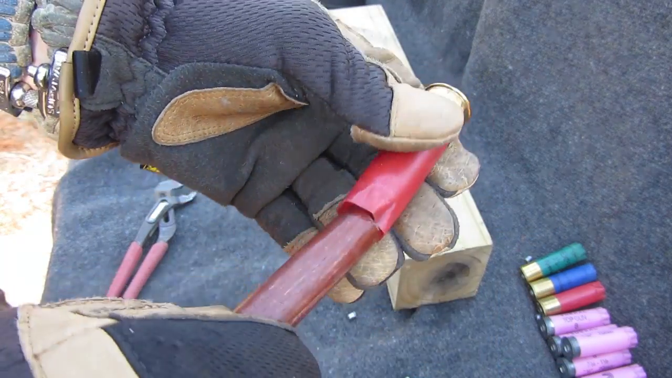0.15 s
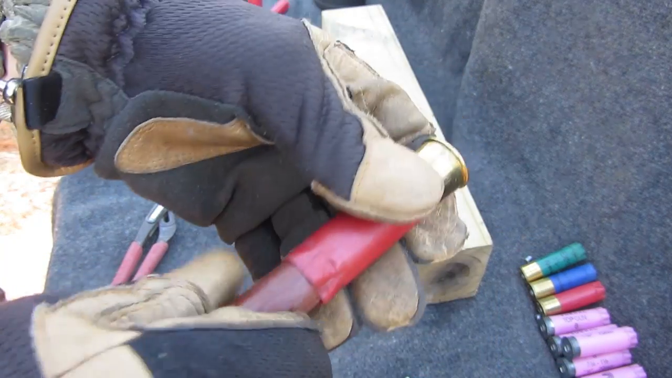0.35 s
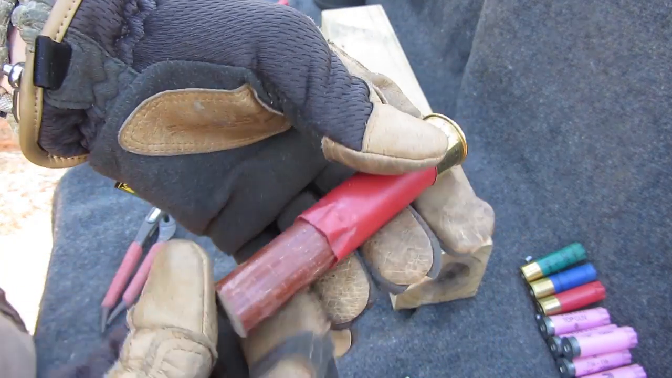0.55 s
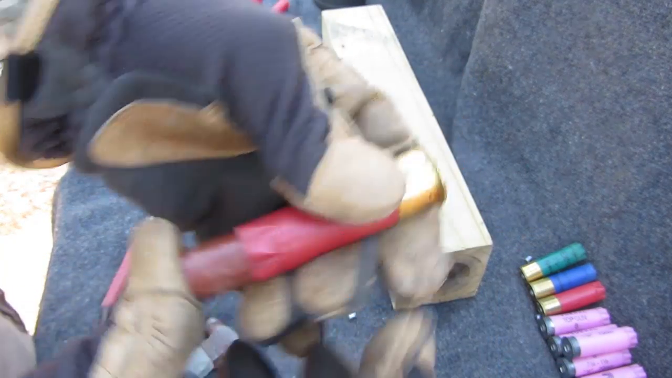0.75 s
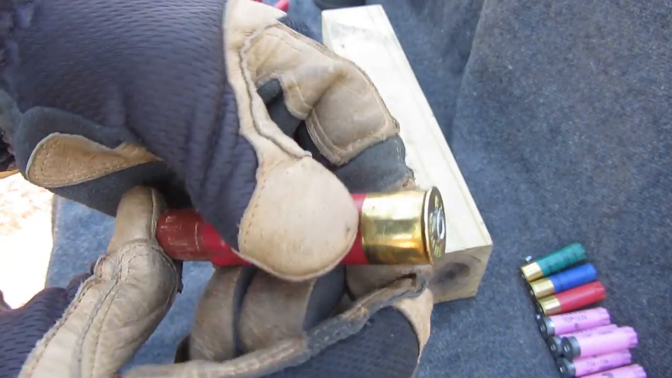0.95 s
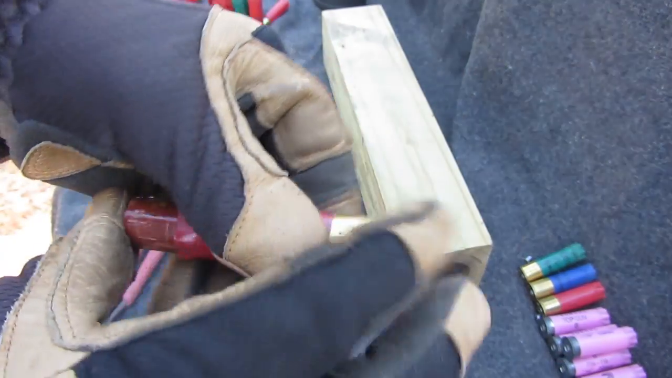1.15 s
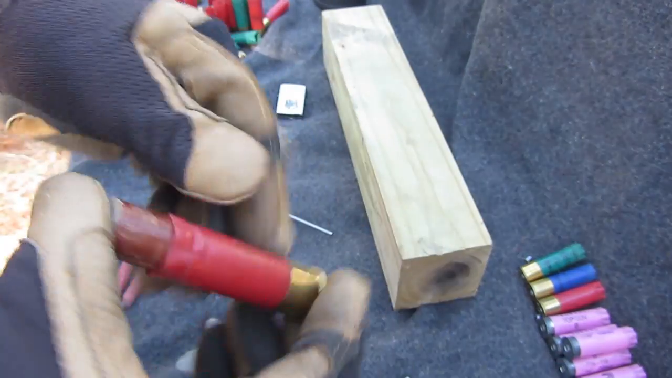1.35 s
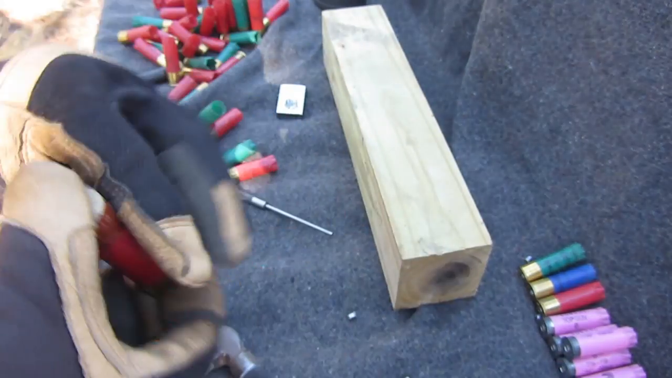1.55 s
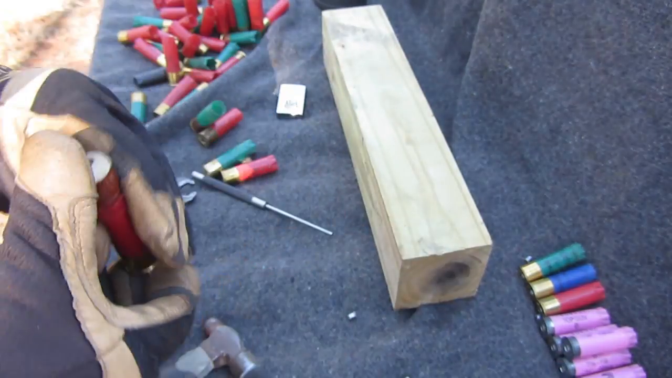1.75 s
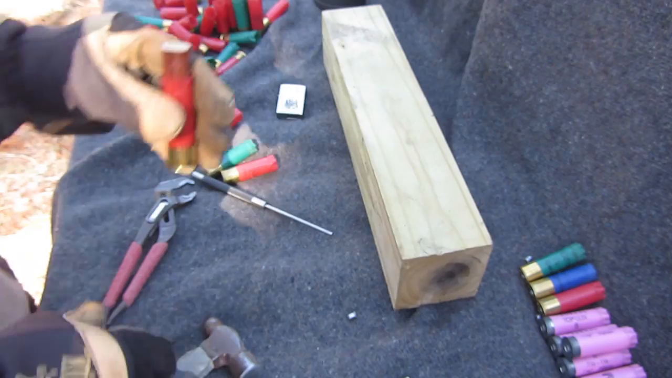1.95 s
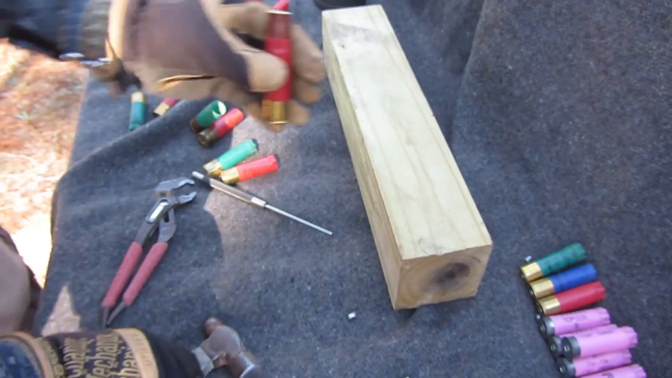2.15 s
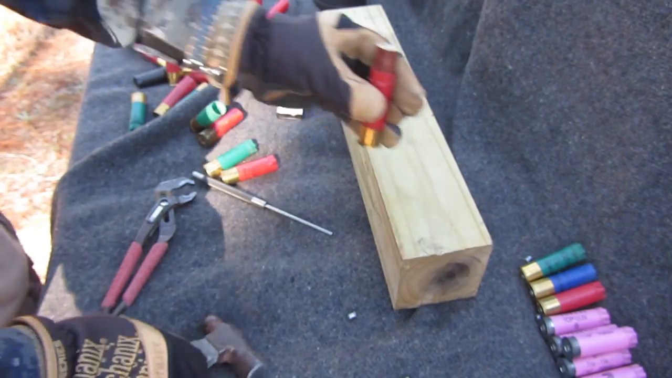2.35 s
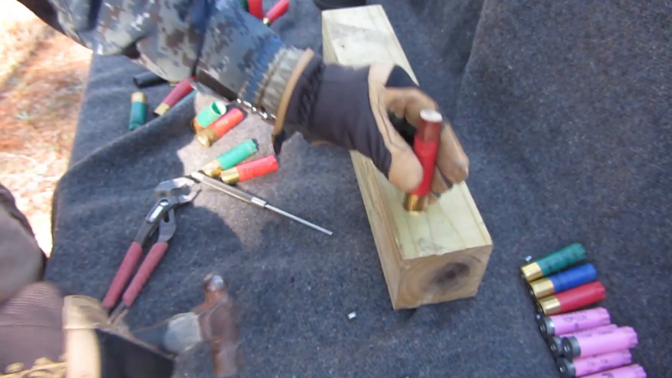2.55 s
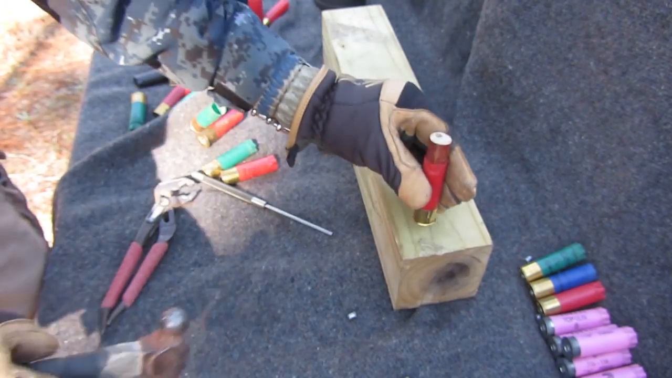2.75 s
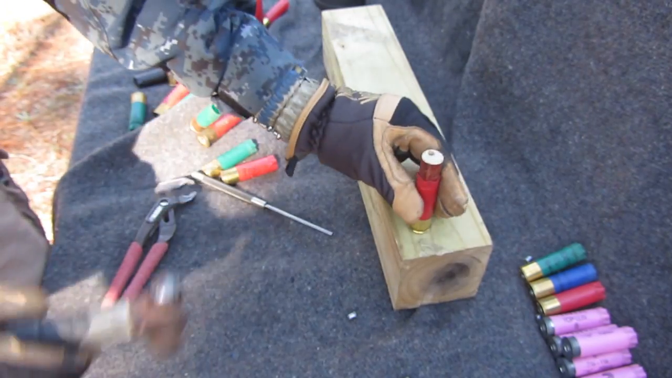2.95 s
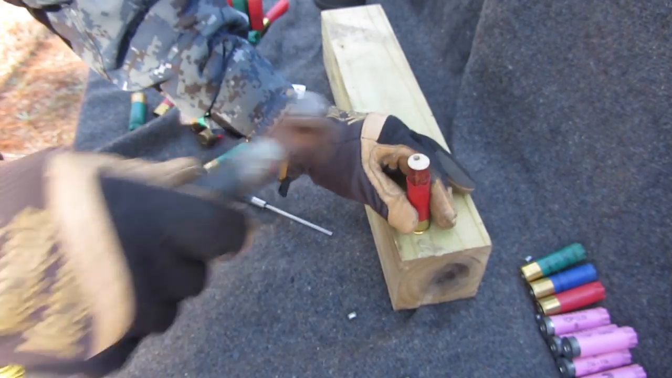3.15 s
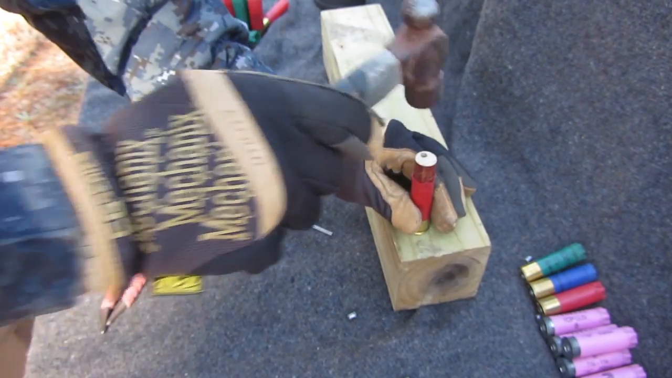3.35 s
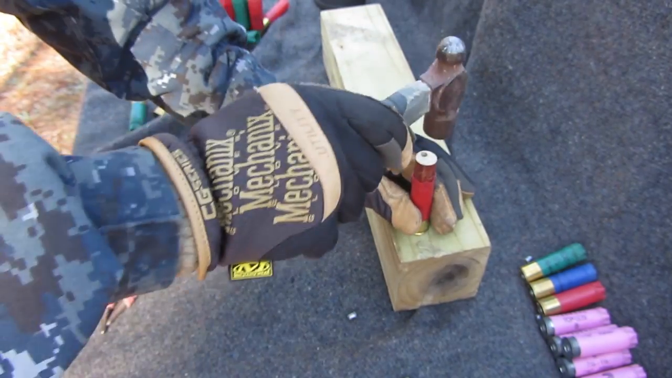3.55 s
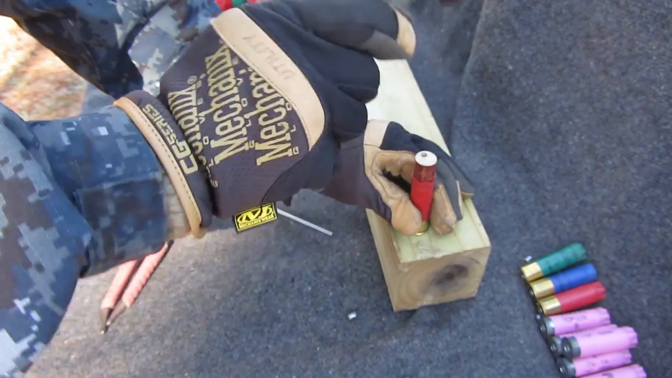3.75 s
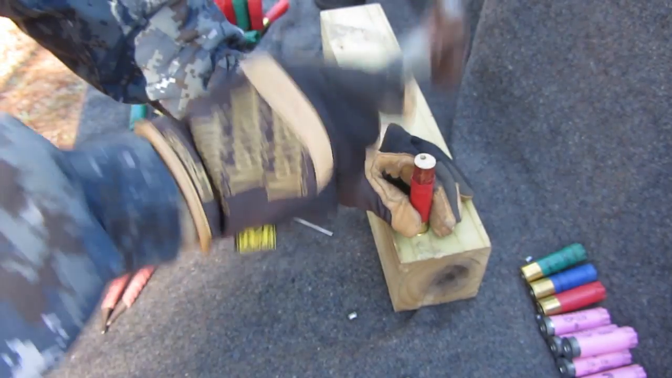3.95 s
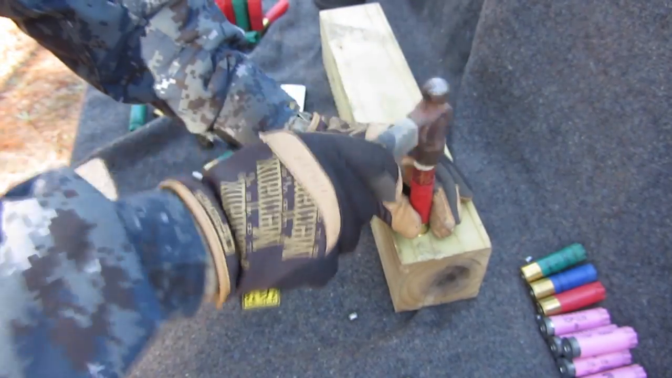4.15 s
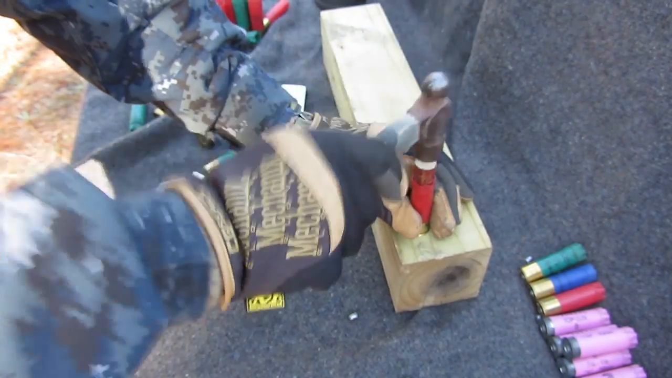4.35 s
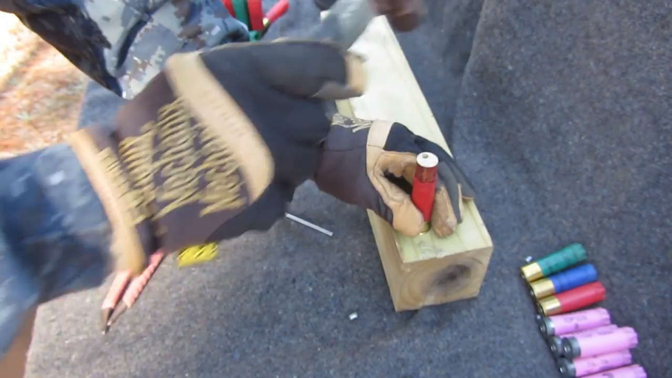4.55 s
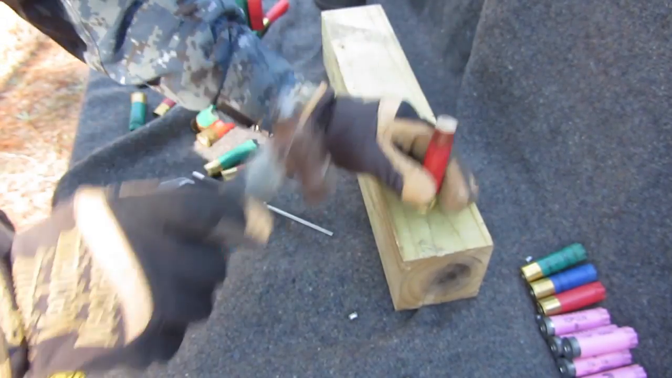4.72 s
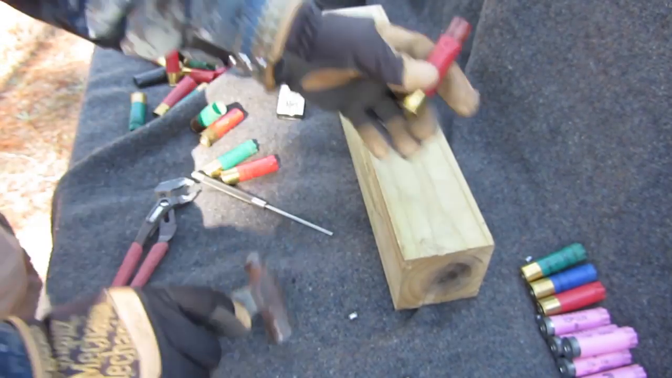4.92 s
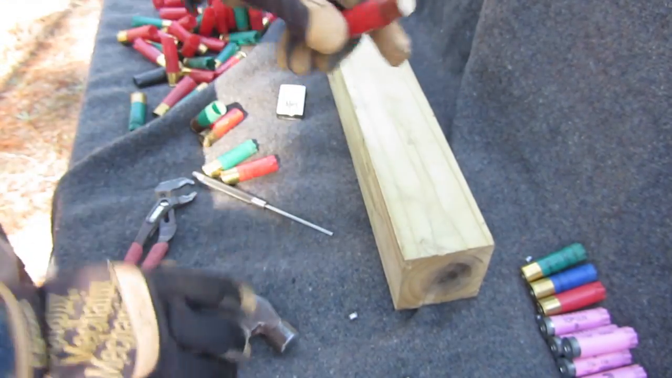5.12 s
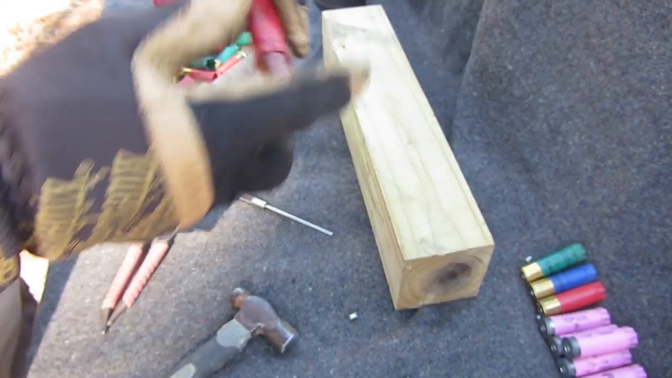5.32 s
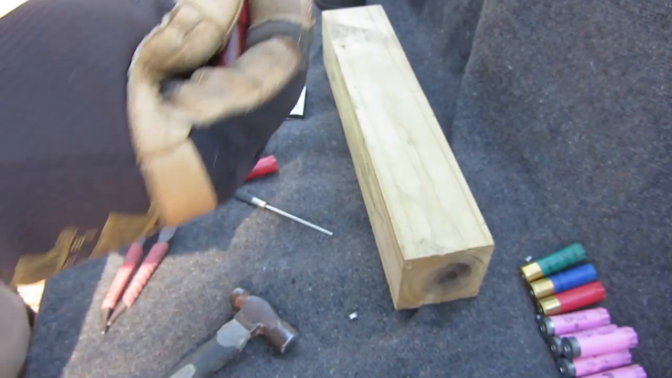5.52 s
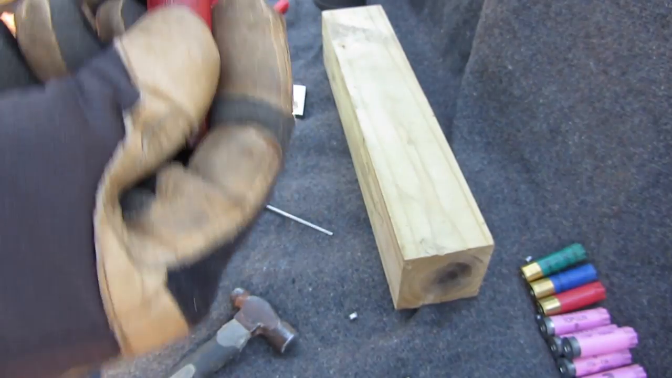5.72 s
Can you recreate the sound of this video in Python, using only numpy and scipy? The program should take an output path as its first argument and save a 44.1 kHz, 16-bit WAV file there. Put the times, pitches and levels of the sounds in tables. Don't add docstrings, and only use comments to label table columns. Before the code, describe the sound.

At arm's length from a small microphone outdoors, plastic clicks and a muffled pop come first, followed by fabric rustle, small ticks and light wind bumps. A small woody knock precedes three hard, steel-bright hammer strikes with deep wooden boom and short rattling tails. Two duller thumps follow, then near quiet with faint rustling over low rumble.

```python
import sys
import numpy as np
from scipy import signal
from scipy.fft import rfft, irfft, next_fast_len
from scipy.io import wavfile
from scipy.ndimage import uniform_filter1d

SR = 44100
rng = np.random.default_rng(int(sys.argv[2]) if len(sys.argv) > 2 else 0)


def natural_amplitude(level_db):
    exponent = np.asarray(level_db, float) / 20
    return 10 ** exponent


def waveform_to_disk(signal):
    frames = np.transpose(np.atleast_2d(signal))
    scaled = np.clip(frames, -1, 1) * 32767
    samples = np.round(scaled).astype(np.int16)
    wavfile.write(sys.argv[1], SR, samples)


N = 254898


def lowpass(x, order, hz):
    return signal.sosfilt(signal.butter(order, hz, fs=SR, output="sos"), x)


def band(x, hz, octaves):
    edges = [hz * 2 ** (-octaves / 2), min(hz * 2 ** (octaves / 2), .45 * SR)]
    return signal.sosfilt(signal.butter(2, edges, "bandpass", fs=SR, output="sos"), x)


def unit(x):
    return x / np.abs(x).max()


def ring(modes, length_s):
    t = np.arange(int(length_s * SR)) / SR
    hz, db, t60 = np.transpose(modes)[:, :, None]
    sound = np.sum(natural_amplitude(db - 60 * t / t60) * np.sin(2 * np.pi * hz * t), axis=0)
    return signal.sosfilt(signal.butter(5, 0.81 * hz.min(), "highpass", fs=SR, output="sos"), sound)


def puff(hz, octaves, t60):
    t = np.arange(int(2 * t60 * SR)) / SR
    return unit(band(rng.standard_normal(len(t)) * natural_amplitude(-60 * t / t60), hz, octaves))


def push(x, contact_s):
    return np.convolve(x, np.hanning(int(contact_s * SR) + 3))[:len(x)]


def bend(x, lag_s):
    size = next_fast_len(2 * len(x))
    khz = np.arange(size // 2 + 1) * SR / size / 1000
    turn = np.exp(-4j * np.pi * 1000 * lag_s * np.sqrt(khz))
    return irfft(rfft(x, size) * turn, size)[:len(x)]


def add(out, s, sound, db, pan_db, lag=0):
    sound = np.atleast_2d(sound) * natural_amplitude(db + np.array([[pan_db], [-pan_db]]) / 2)
    for channel, start in enumerate([int(s * SR) + lag, int(s * SR)]):
        piece = out[channel, start:start + sound.shape[1]]
        piece += sound[channel, :len(piece)]


def walk(rate):
    k = int(SR / rate)
    steps = np.repeat(rng.standard_normal(N // k + 1), k)
    return 1.2 * uniform_filter1d(uniform_filter1d(steps, k), k)[:N]


def gestures(t, rows, db):
    fade_db = 8.5
    s, half_s = np.array(rows)[:, :2, None].transpose(1, 0, 2)
    return np.sum(natural_amplitude(2 * (db[:, None] - fade_db * np.abs(t - s) / half_s)), axis=0)


# t/s, level/dB
GAIN = [
    (0, -55.5),
    (.4, -65),
    (1.9, -57),
    (3.9, -51.5),
    (3.93, -67),
    (4.25, -66.5),
    (5.78, -69),
]
OUTDOORS = [-6, -0.5, -10, -13.5]
# t/s, level over the gain/dB
STIR = [
    (0, -2.5),
    (.7, -3.5),
    (1.3, -3.5),
    (1.85, -2.5),
    (2.3, 0),
    (2.85, -3),
    (3.9, -7),
    (3.95, -16),
    (4.6, -12.5),
    (5.78, -5),
]
# peak t/s, half-length/s, level/dB, brightness/dB
RUSTLES = [(0, 0.039, -62, 1), (.36, 0.039, -59, 1.5), (.586, 0.027, -55, -4), (.77, 0.052, -53, -2),
           (.88, 0.03, -55.5, 4), (1.06, 0.019, -53.5, -3), (1.15, 0.045, -53.5, -5.5),
           (1.234, 0.031, -58, -5), (1.397, 0.079, -55.5, -2.5), (1.48, 0.02, -50, -8),
           (1.8, 0.015, -62, 0), (1.98, 0.032, -56.5, -6), (2.1, 0.21, -52, -6), (2.3, 0.0067, -48, -10),
           (2.47, 0.066, -51.5, 0), (2.55, 0.034, -62, 7.5), (2.64, 0.076, -61.5, 3.5),
           (2.95, 0.087, -63, -19), (3.044, 0.014, -46, 1), (3.11, 0.052, -50.5, -6),
           (3.242, 0.073, -49, -2.5), (3.36, 0.2, -54.5, 0), (3.5, 0.11, -49, -7.5), (3.73, 0.013, -67, 11),
           (3.885, 0.025, -53, 0.5), (4.18, 0.026, -73, 1.5), (4.728, .015, -76.5, -3),
           (4.862, 0.045, -63.5, -9), (5.24, 0.051, -77, 6.5), (5.548, 0.088, -68.5, -3),
           (5.748, 0.018, -64.5, -6.5)]
# peak t/s, half-length/s, level/dB
GUSTS = [(.06, 0.1, -58.5), (.486, 0.027, -67), (0.573, 0.014, -55), (.9, 0.072, -66), (1.1, 0.18, -65),
         (1.62, 0.031, -58), (2.03, .03, -66), (2.804, .15, -56), (3.122, 0.034, -48), (3.25, 0.048, -49.5),
         (3.4, .1, -55), (3.691, .05, -56), (3.84, .04, -58.5), (4.862, 0.077, -61.5), (5.47, 0.032, -53),
         (5.78, 0.028, -59)]
# peak t/s, half-length/s, level/dB
SHIFTS = [(0, 0.039, -51.5), (0.17, 0.053, -56.5), (0.768, 0.065, -57), (0.972, 0.034, -61),
          (1.48, 0.15, -57), (2.094, 0.2, -53), (2.467, 0.27, -51.5), (3.013, 0.029, -54.5),
          (3.53, 0.32, -50.5), (3.72, 0.031, -51.5), (4.694, .03, -53.5), (4.759, .04, -66)]


def movement():
    t = np.arange(0, N, 44) / SR
    gain_db = np.interp(t, *np.transpose(GAIN))
    stir = natural_amplitude(2 * (gain_db + np.interp(t, *np.transpose(STIR))))
    cloth_db, bright_db = np.transpose(RUSTLES)[2:]
    wind = gestures(t, GUSTS, np.transpose(GUSTS)[2])
    rumble = gestures(t, SHIFTS, np.transpose(SHIFTS)[2])
    body = stir + gestures(t, RUSTLES, cloth_db)
    sheen = stir * natural_amplitude(2 * -8) + gestures(t, RUSTLES, cloth_db + bright_db)
    outdoors = natural_amplitude(2 * (gain_db + np.array(OUTDOORS)[:, None]))
    db = 10 * np.log10(np.array([wind, rumble, body, sheen]) + outdoors)
    return np.array([np.interp(np.arange(N) / SR, t, row) for row in db])


# f/Hz, level per Hz/dB
COLOUR = [(18, -46), (30, -15.5), (86, 0), (540, -4.5), (584, -3.5), (1130, -9), (2170, -7.5), (3670, -15),
          (5740, -13), (7870, -14.5), (14000, -26.5), (16000, -44.5)]
# f/Hz, left-right likeness (-1 to 1)
ALIKE = [(60, -0.39), (130, -0.21), (290, -0.18), (640, 0.066), (1410, 0.36), (3100, 0.25), (6820, 0.14),
         (15000, 0.25)]


def cloth():
    steer = movement()
    fibres = natural_amplitude(np.minimum(1.9 * rng.exponential(size=N), 9) * (rng.random(N) < .05))
    out, shared = 0, walk(30)
    centres = 30 * 2 ** np.arange(0, 9.3, .5)
    colour_hz, colour_db = np.transpose(COLOUR)
    alike_hz, likeness = np.transpose(ALIKE)
    shape_db = np.interp(np.log(centres), np.log(colour_hz), colour_db)
    for hz, db in zip(centres, shape_db):
        place = np.interp(np.log(hz), np.log([70, 300, 1600, 6000]), np.arange(4))
        share = np.maximum(1 - np.abs(place - np.arange(4)), 0)
        alike = np.clip(np.interp(np.log(hz), np.log(alike_hz), likeness), -1, 1)
        mid, side = band(rng.standard_normal((2, N)) * fibres, hz, 0.57)
        pair = np.sqrt(1 + alike) * mid + np.sqrt(1 - alike) * side * np.array([[1], [-1]])
        lift_db = share @ [27.35, 17.9, 14.0, 17.8]
        flicker_db = 1.4 * shared + 0.41 * walk(15)
        out = out + natural_amplitude(db + lift_db + share @ steer + flicker_db) * pair
    return out


# t/s, peak level/dB, f/Hz, t60/s, left minus right/dB
TICKS = [(.0448, -15, 2250, .004, -4.5), (.057, -44, 7500, .004, 0), (0.0732, -46, 9000, .0012, 4),
         (0.1045, -35, 8100, 0.0011, 7), (.247, -46, 1080, .04, -4), (.259, -49, 990, .03, -4),
         (0.281, -42.5, 830, 0.016, -5), (.575, -50, 100, 0.05, -10), (.99, -53.5, 12500, .04, 4),
         (1.15, -50, 2190, .06, -6), (1.495, -42, 1630, 0.0023, 8), (1.653, -48, 1200, 0.0017, 0),
         (2.041, -40, 400, 0.014, 11), (2.298, -47, 12500, 0.0033, 4), (2.3, -47, 2000, .003, 0),
         (2.998, -45, 1950, .009, -6), (3.134, -41, 1200, 0.0061, 0), (3.158, -42, 1000, .006, 0),
         (3.205, -47, 1510, .05, -3), (3.25, -46, 1500, .05, -3), (3.3, -49, 1490, .05, -3),
         (3.593, -40, 240, .03, 5), (3.595, -37, 620, .01, 7), (4.722, -63, 8180, 0.016, -2),
         (4.723, -59.5, 1520, .05, -1), (5.021, -54, 7500, .02, -2.5), (5.749, -55.5, 1200, 0.0068, 3),
         (5.75, -47, 6400, 0.0053, 7)]
# t/s, peak level/dB, f/Hz, t60/s, left minus right/dB
SET_DOWN = [
    (2.904, -37.5, 3700, 0.0026, -5),
    (2.9039, -24.5, 1020, 0.003, -5),
    (2.9045, -35, 640, 0.0053, -10),
    (2.905, -30, 1516, 0.058, -3.5),
]


def ticks():
    out = np.zeros((2, N))
    for s, db, hz, t60, pan_db in TICKS + SET_DOWN:
        grit = 1 + .1 * rng.standard_normal(12)
        rough = np.convolve(ring([(hz, 0, t60)], 1.2 * t60), grit[:int(1 + 4000 / hz)])
        add(out, s, unit(push(rough, 0.18 / hz)), db, pan_db)
    return out


# t/s, level/dB
SCRAPE = [
    [(0.235, -81.5), (0.245, -46), (0.299, -49), (0.359, -43.5), (0.375, -52.5)],
    [(3.022, -60), (3.043, -49), (3.054, -50), (3.066, -65.5)],
    [(3.18, -64.5), (3.22, -53), (3.27, -50), (3.33, -60.5)],
]
# t/s, level/dB
SLIPS = [
    (0.2456, -44),
    (0.3246, -38),
    (0.328, -36.5),
    (0.332, -33),
    (0.336, -32),
    (0.3508, -36),
    (0.3565, -34),
]


def scrape():
    t = np.arange(N) / SR
    db = np.max([np.interp(t, *np.transpose(rows), -120, -120) for rows in SCRAPE], axis=0)
    clicks = (rng.random(N) < 5000 / SR) * rng.standard_normal(N) * natural_amplitude(2.3 * walk(280))
    wall = band(band(clicks, 1900, .6), 1900, 1.0)
    wall = wall + natural_amplitude(-3.0) * band(band(clicks, 3300, 0.46), 3000, 0.83)
    wall = wall + natural_amplitude(-11.5 + 0.38 * (db + 36.5)) * band(clicks, 6000, 1.6)
    out = natural_amplitude(db - 2.5) * wall / wall.std() * natural_amplitude(np.array([[-1.2], [1.2]]))
    for s, slip_db in SLIPS:
        add(out, s, puff(2400, 1.1, .009) + puff(5500, 1.1, .009), slip_db, -1.5)
    return out


# f/Hz, level/dB, t60/s
TUBE = [(1036, -3.5, 0.031), (2000, -9, 0.006), (3570, -1.5, 0.016), (2600, -7, .004), (4550, -9.5, .005),
        (6300, -9, .008), (6750, -10.5, 0.012), (7700, -14.5, 0.0072), (9200, -10, 0.009),
        (10170, -25, 0.0054), (11550, -24, .008), (14140, -30.5, 0.004)]
# t/s, level/dB, air pitch ratio, brightness/dB per octave, left minus right/dB
SNAPS = [
    (0.0439, -14, 1.02, 0, -4.5),
    (0.1778, -38, 1.04, -5.5, -4.5),
    (0.2166, -15.5, 1.03, 2, -4.5),
    (0.244, -41, 1, -3.5, -0.5),
]
# dull level/dB, bright level/dB
LIPS = [
    (-17, -14),
    (-46, -56),
    (-27, -10),
    (-46, -50),
]


def snaps():
    out = np.zeros((2, N))
    for (s, db, ratio, tilt_db, pan_db), (dull_db, bright_db) in zip(SNAPS, LIPS):
        modes = np.array(TUBE)
        modes[:, 1] += tilt_db * np.log2(modes[:, 0] / modes[0, 0])
        modes[0, 0] *= ratio
        add(out, s + 0.00046, ring(modes, 0.08), db, pan_db)
        add(out, s, puff(2500, 1.4, 0.0008), dull_db, pan_db)
        add(out, s, puff(6500, 1.5, 0.006), bright_db, pan_db, lag=1)
    return out


# f/Hz, level/dB, t60/s
SEAT = [(555, -25, 0.01), (1020, -21, 0.0042), (1700, -4, 0.003), (2400, -2, 0.0026), (3200, -2, .003)]
# t/s, level/dB, left minus right/dB
SEATING = (.792, -6.5, -3.5)


def seating():
    out = np.zeros((2, N))
    s, db, pan_db = SEATING
    pop = ring(SEAT[:2], .03) + band(ring(SEAT[2:], .03), 2500, 1.1)
    add(out, s, unit(lowpass(pop, 5, 3800)), db + 3.1, pan_db)
    grow = 882
    hiss = puff(7000, 1.14, 0.059)[grow::-1]
    add(out, s - grow / SR, hiss, db - 27, pan_db)
    return out


# t/s, boom level/dB, clack level/dB, rattle level/dB, bending delay at 1 kHz/s
BLOWS = [
    (3.9096, -7, -8.5, -31, .0011),
    (4.201, -6, -9.5, -25.5, .001),
    (4.422, -7, -8.5, -29, .001),
]


def jolts():
    out = np.zeros((2, N))
    for s, boom_db, *_ in BLOWS:
        add(out, s, puff(55, 1.1, .22), boom_db - 35, -2.5)
    return out


# f/Hz, level/dB, t60/s
RATTLE = [(193, -6.5, 0.88), (340, 3.5, 0.34), (680, -1.5, 0.34), (1290, -2.5, 0.28), (2270, -4, 0.23),
          (3420, -1, 0.099), (5185, -4.5, 0.098), (9000, -25.5, 0.069)]


def rattle(tilt_db, rise_s, wide):
    t = np.arange(int(.7 * SR)) / SR
    mid, side = rng.standard_normal((2, len(t)))
    noise = (mid + wide * side * np.array([[1], [-1]])) * natural_amplitude(1.8 * walk(90)[:len(t)])
    tail = 0
    for k, (hz, db, t60) in enumerate(RATTLE):
        buzz = band(band(noise, hz, 0.78), hz, 1.72) / np.sqrt(hz / SR)
        tail = tail + natural_amplitude(db + tilt_db * k - 60 * t / t60) * buzz
    return tail * (1 - np.exp(-t / rise_s)) ** 2


def deck(table, column, contact_s, lag_s, detune):
    modes = np.array(table)[:, [0, column + 1, -1]]
    modes[:, 0] *= 1 + detune * rng.standard_normal(len(modes))
    boom = ring(modes[3:], 1.2) + ring(modes[:3], 1.2)
    return unit(bend(push(boom, contact_s), lag_s))


# t/s, boom level/dB, rattle level/dB, left minus right/dB
THUDS = [
    (5.016, -14.5, -40.5, -3.5),
    (5.179, -17.5, -44.5, -3),
]
# f/Hz, level under head/dB, level under handle/dB, t60/s
DECK_ASIDE = [(84, -22.5, -24.5, 0.56), (137.6, -22.5, -40.5, 1.1), (165, -27, -32, 1.2),
              (162, -3, -14, 0.39), (199, -1, -7, 0.26), (214, 7.5, 4.5, 0.11), (245, -28, -15, 0.47),
              (277, -17, -9.5, 0.45), (293.3, 5, 3.5, 0.13), (340, -11.5, -16, .3), (372, -13.5, -17, 0.28),
              (490, -10, -13, 0.21), (564, -31, -27, 0.4), (596, -19, -32, 0.36), (673, -12.5, -23.5, 0.21),
              (745, -22.5, -28, .15), (803, -26, -27, 0.31), (915, -21, -27, 0.27), (957, -20.5, -26, .28),
              (1168, -31.5, -25, .16), (1265, -18, -16, .16), (1380, -29, -31, .26), (1486, -33, -27, .19)]


def laid_down():
    out = np.zeros((2, N))
    for column, (s, boom_db, rattle_db, pan_db) in enumerate(THUDS):
        boom = deck(DECK_ASIDE, column, contact_s=0.0014, lag_s=0.00028, detune=0.002)
        add(out, s, boom, boom_db + 6.0, pan_db)
        add(out, s, rattle(-2.67, 0.0067, 0.45), rattle_db + 5.5, pan_db)
    return out


# f/Hz, level in blow one/dB, two/dB, three/dB, t60/s
DECK = [(90.4, -20, -17.5, -18.5, 0.43), (140, -31, -33, -34, .9), (164, -29.5, -34.5, -31.5, 1.9),
        (164, -11, -13, -12, 0.24), (167, -2, -1, -1, .17), (210.6, -10.5, -9.5, -8, 0.36),
        (214, -9, -9, -10.5, 0.12), (236, 2, -0.5, 2, 0.11), (248, -18.5, -21, -19.5, 0.44),
        (273, -14.5, -15.5, -14, 0.58), (286, -7.5, -5.5, -6, 0.32), (295, -17, -16.5, -17, 0.77),
        (344.7, -11.5, -7.5, -8, 0.44), (375.2, -6, -2.5, -2, 0.31), (425, -28, -22, -27, .3),
        (490, -20, -17.5, -19, 0.37), (517, -16.5, -23.5, -16.5, 0.14), (583, -24, -22.5, -22, 0.45),
        (667, -24.5, -24, -27, .45), (703, -20.5, -20, -25, .2), (750, -20, -24.5, -26.5, .3),
        (770, -22.5, -28.5, -27.5, .3), (848, -20, -25.5, -31, 0.39), (906, -21.5, -21.5, -31.5, 0.23),
        (990, -21.5, -25.5, -36.5, .42), (1090, -30, -31.5, -26.5, .23), (1215, -19.5, -16, -14, .12),
        (1300, -35.5, -28, -35, .3)]
# t/s, level/dB
REBOUNDS = [
    (3.9275, -27),
    (3.933, -19),
    (3.947, -28),
    (4.218, -20.5),
    (4.2238, -10),
    (4.2372, -15),
    (4.439, -20),
    (4.4447, -10),
    (4.4582, -17),
]


def rebounds():
    out = np.zeros((2, N))
    for k, (s, db) in enumerate(REBOUNDS):
        add(out, s, deck(DECK, k // 3, contact_s=0.0021, lag_s=0.00083, detune=0.0039), db, -1.5)
        add(out, s, rattle(2.2, 0.0015, .5), db - 37.0, -1.5)
    return out


# f/Hz, level/dB, t60/s
BLOCK = [(850, -13.5, 0.004), (1230, 6.5, 0.008), (1476, 1, 0.0061), (1896, -9, 0.026), (1470, -20, 0.11),
         (2310, -27, 0.058), (2890, -25.5, 0.17), (3530, -24, 0.1), (5900, -30, .06)]


def blows():
    out = np.zeros((2, N))
    for column, (s, boom_db, clack_db, rattle_db, lag_s) in enumerate(BLOWS):
        clack = bend(push(ring(BLOCK, .2), 0.0002), .0022)
        add(out, s, unit(clack), clack_db, -2.5)
        boom = deck(DECK, column, contact_s=0.00098, lag_s=lag_s, detune=0.0015)
        add(out, s, boom, boom_db, -2.8)
        add(out, s, rattle(0, .002, 0.45), rattle_db, -2.5)
    return out


# t/s, level/dB, STEEL level column (0 to 2)
CRACKS = [
    (3.9096, -5.5, 0),
    (3.909, -16, 0),
    (3.9153, -27.5, 1),
    (3.9434, -39, 1),
    (4.2015, -9, 1),
    (4.2028, -15.5, 2),
    (4.2035, -20, 1),
    (4.4215, -10, 2),
    (4.4225, -17, 1),
    (4.424, -20.5, 2),
]
# f/Hz, level in blow one/dB, two/dB, three/dB, t60/s
STEEL = [(2300, -10.5, -8, -7.5, .004), (3050, -8.5, -8.5, -8.5, .004), (3840, -1.5, -2.5, 7, 0.0042),
         (4900, -1.5, -2.5, -11.5, 0.0072), (5850, -13.5, 1, -6.5, .007), (7500, -7.5, -9.5, -0.5, .006),
         (8300, -0.5, -12.5, -10.5, .005), (9510, -8, -14.5, -14, .005), (10300, -17.5, -17.5, -19, 0.0037),
         (12200, -18.5, -26, -27, .004), (14500, -20.5, -31.5, -31.5, .004)]


def cracks():
    out = np.zeros((2, N))
    for s, db, blow in CRACKS:
        modes = np.array(STEEL)[:, [0, round(blow) + 1, -1]]
        add(out, s, unit(ring(modes, .02)), db, -.8, lag=1)
        grit = [puff(6000, 0.6, .008), puff(6000, 0.92, .008)]
        add(out, s, grit, db - 6.5, 0)
    return out


# f/Hz, width/octaves, side level/dB, delay/s
DECK_SIDES = [
    (300, .7, -13.5, 0.00043),
    (650, .9, -8, 0),
    (2600, 0.98, -9.5, 0.01),
]


def hammer():
    pair = cracks() + blows() + rebounds() + laid_down()
    mid = pair.mean(axis=0)
    side = 0
    for hz, octaves, db, delay_s in DECK_SIDES:
        side = side + natural_amplitude(db) * np.roll(band(mid, hz, octaves), int(delay_s * SR))
    return pair + side * np.array([[1], [-1]])


def scene():
    return cloth() + ticks() + scrape() + snaps() + seating() + jolts() + hammer()


def band_limit(x):
    return signal.sosfilt(signal.butter(12, 16730, fs=SR, output="sos"), x)


def record(dry):
    mic = lowpass(dry, 2, 11800)
    rounded = np.tanh(1.14 * mic) / 1.111
    edge = signal.ellip(8, .2, 80, 16300, fs=SR, output="sos")
    mix = signal.sosfilt(edge, rounded)
    return band_limit(mix)


dry = scene()
out = record(dry)
waveform_to_disk(out)
```